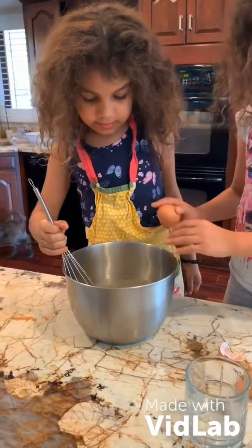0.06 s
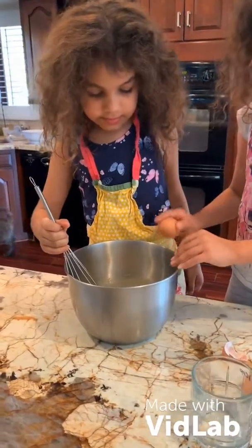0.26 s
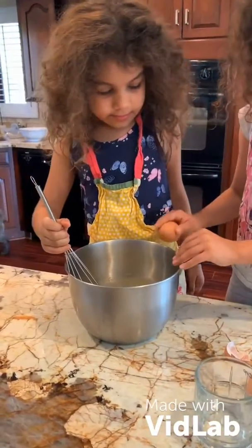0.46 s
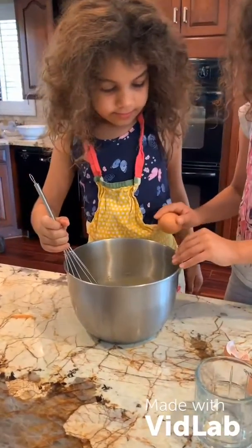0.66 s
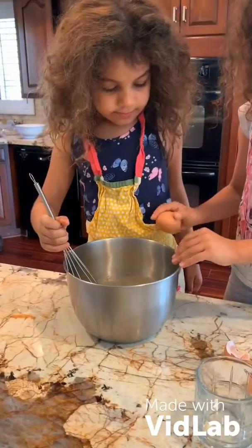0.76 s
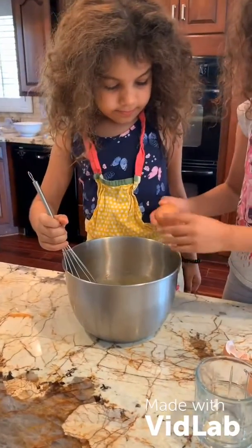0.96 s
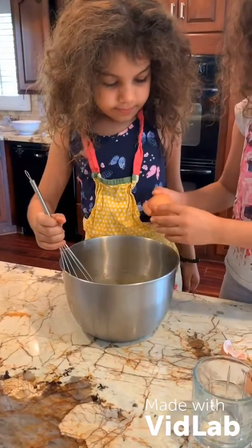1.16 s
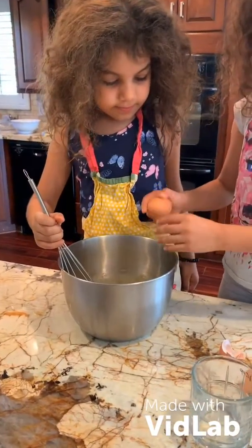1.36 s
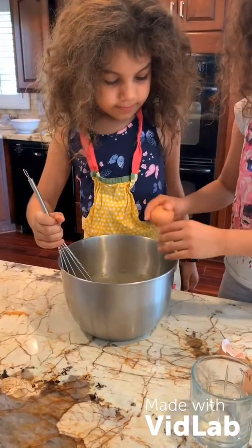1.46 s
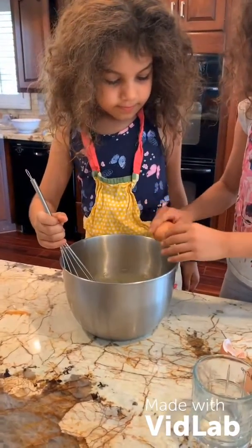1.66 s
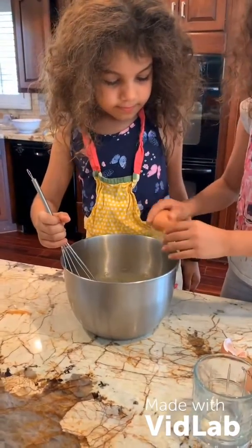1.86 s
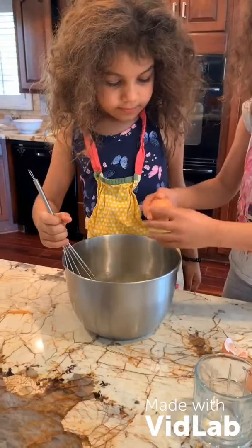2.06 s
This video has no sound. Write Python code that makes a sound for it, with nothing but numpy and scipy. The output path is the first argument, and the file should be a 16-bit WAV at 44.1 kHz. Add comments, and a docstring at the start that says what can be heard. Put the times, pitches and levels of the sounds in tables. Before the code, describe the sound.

An egg taps sharply on a steel mixing bowl rim, then again more softly, in a kitchen

```python
"""Under everything, a wavering low room rumble with a smooth hiss: shaped stereo noise.
First an egg is tapped on a steel bowl's rim: noise bursts crack and crunch, dying sines knock, thump, ring and boom.
Hands rustle (shaped noise) around a second, quieter tap with a shorter ring and a tiny shell tick.
Two more shell ticks follow, noise snaps with faint pings; a hard-walled kitchen answers taps and ticks.
The two channels drift apart in phase towards the treble."""
import sys
import numpy as np
from scipy import signal
from scipy.fft import rfft, irfft, next_fast_len
from scipy.io import wavfile
from scipy.ndimage import uniform_filter1d, map_coordinates

SR = 44100
rng = np.random.default_rng(int(sys.argv[2]) if len(sys.argv) > 2 else 0)


def file_out(sig):
    """Save sig as 16-bit WAV at sys.argv[1]."""
    # one column per channel
    cols = np.atleast_2d(sig).T
    # limit, then scale
    lim = np.clip(cols, -1, 1)
    pcm = np.round(lim * 32767).astype(np.int16)
    wavfile.write(sys.argv[1], SR, pcm)


N = 92610  # samples


def amp(db):
    """Decibels to gain."""
    return 10 ** (np.asarray(db) / 20)


def unit(x):
    """Scale to rms 1."""
    return x / np.sqrt(np.mean(x ** 2) + 1e-20)


def along(points, hz):
    """Interpolate (Hz, value) points on a log-frequency axis."""
    point_hz, value = np.transpose(points)
    return np.interp(np.log(hz + 1), np.log(point_hz + 1), value)


def since(start_s):
    """Seconds since start_s, zero before it."""
    return np.maximum(np.arange(N) / SR - start_s, 0)


def swell(t, rise_s):
    """Exponential approach to 1 with time constant rise_s."""
    return 1 - np.exp(-t / rise_s)


def fade(t, t60_s):
    """Exponential decay, down 60 dB after t60_s."""
    return np.exp(-np.log(1000) * t / t60_s)


def wobble(knots_per_s, knots=400):
    """Smooth random curve: a spline through normal random knots."""
    return map_coordinates(rng.standard_normal(size=knots), [since(0) * knots_per_s])


def filtered(x, response):
    """Multiply the spectrum of x by a response of frequency."""
    size = next_fast_len(N + SR // 2)
    hz = np.fft.rfftfreq(size, 1 / SR)
    return irfft(rfft(x, size) * response(hz), size)[..., :N]


def coloured(x, points):
    """Minimum-phase filter through (Hz, dB) points, by folding the cepstrum to be causal."""
    size = 2 * next_fast_len(N)
    hz = np.fft.rfftfreq(size, 1 / SR)
    cepstrum = irfft(np.log(amp(along(points, hz))))
    cepstrum[1:size // 2] *= 2
    cepstrum[size // 2 + 1:] = 0
    return irfft(rfft(x, size) * np.exp(rfft(cepstrum)))[..., :N]


# Likeness of the two channels. Each row: frequency in Hz, correlation from 0 to 1.
CHANNEL_LIKENESS = [(100, 0.95), (350, 1), (650, 0.12), (1500, 0.66), (3000, 0.35), (4000, 0.61), (4600, 1),
                    (15000, 1)]


def diffuse():
    """White stereo noise; the mid/side balance sets channel correlation by frequency."""
    def mid_side_gain(hz):
        angle = np.arccos(np.clip(along(CHANNEL_LIKENESS, hz), -1, 1)) / 2
        return np.array([np.cos(angle), np.sin(angle)])

    mid, side = filtered(rng.standard_normal((2, N)), mid_side_gain)
    return np.array([mid + side, mid - side])


def burst(envelope, count=6):
    """Noise under an envelope, alternately flattened in spectrum and in time so no band is missing."""
    x = envelope * rng.standard_normal(N)
    for _ in range(count):
        spectrum = rfft(x)
        x = irfft(spectrum / (abs(spectrum) + 1e-12), N)
        local_rms = np.sqrt(abs(uniform_filter1d(x * x, size=64)) + 1e-12)
        x = envelope * x / local_rms
    return x


WANDER_KNOTS_PER_S = 29


def ring(modes, t, wander_rad, attack_s=0, rise_cycles=0):
    """Sum of dying sines, one per mode, that swell in and wander in phase."""
    total = 0
    for k, (hz, db, t60_s) in enumerate(modes):
        envelope = swell(t, attack_s + rise_cycles / hz) * fade(t, t60_s)
        phase = 2 * np.pi * hz * t + wander_rad * wobble(WANDER_KNOTS_PER_S)
        total = total + (-1) ** k * amp(db) * envelope * np.sin(phase)  # alternating polarity
    return total


# Rumble and hiss spectrum. Each row: frequency in Hz, relative density in dB.
RUMBLE_SPECTRUM = [(15, -23), (30, -15), (48, 3), (64, -9), (92, 3), (125, -6), (161, -10.5), (220, -4),
                   (280, -3), (330, -10.5), (430, -13), (650, -21), (1000, -32.5), (1400, -35.5),
                   (1800, -37.5), (2400, -39), (3200, -42.5), (6000, -42.5), (7400, -41), (10000, -45.5),
                   (14000, -46), (16000, -60.5)]
RUMBLE_DB, WAVER_DB, WAVER_KNOTS_PER_S, WAVER_BELOW_HZ = -60.5, 0.9, 8.3, 830


def room_tone():
    """Low rumble under a smooth hiss: shaped noise whose low part wavers in level."""
    noise = unit(filtered(diffuse(), lambda hz: amp(along(RUMBLE_SPECTRUM, hz))))
    low = filtered(noise, lambda hz: 1 / (1 + (hz / WAVER_BELOW_HZ) ** 2))
    waver_gain = amp(WAVER_DB * wobble(WAVER_KNOTS_PER_S, knots=200))
    return amp(RUMBLE_DB) * (noise + low * (waver_gain - 1))


# Rustle level. Each row: time in seconds, level in dB.
RUSTLE_LEVEL = [(1.0, -90.5), (1.25, -77), (1.5, -68.5), (1.64, -69.5), (1.75, -62.5), (1.81, -75),
                (1.9, -88)]
# Rustle spectrum. Each row: frequency in Hz, relative density in dB.
RUSTLE_SPECTRUM = [(100, -20), (330, 6.5), (560, 8), (800, -4), (1550, -5.5), (2000, -12), (2600, -13),
                   (3500, -19), (8000, -29.5), (16000, -49.5)]
RUSTLE_WAVER_DB, RUSTLE_KNOTS_PER_S = 2.5, 20


def rustle():
    """Hands shift their hold on the egg around the second tap: shaped noise of unsteady level."""
    level_db = np.interp(since(0), *np.transpose(RUSTLE_LEVEL))
    level_db = level_db + RUSTLE_WAVER_DB * wobble(RUSTLE_KNOTS_PER_S)
    noise = unit(filtered(diffuse(), lambda hz: amp(along(RUSTLE_SPECTRUM, hz))))
    return amp(level_db) * noise


# First echoes from counter and cupboards. Each row: delay in seconds, level in dB.
WALL_ECHOES = [(.0105, -12.5), (.0195, -11), (.029, -14)]
WALLS_DULL_HZ = 3500


def walls(x):
    """First echoes: delayed copies through a one-pole low-pass."""
    def response(hz):
        echoes = sum(amp(db) * np.exp(-2j * np.pi * hz * delay_s) for delay_s, db in WALL_ECHOES)
        return echoes / (1 + 1j * hz / WALLS_DULL_HZ)

    return filtered(x, response)


# Kitchen decay. Each row: frequency in Hz, t60 in seconds.
KITCHEN_T60 = [(100, 0.83), (400, 0.72), (1000, 0.67), (2500, 0.71), (4500, 0.63), (7000, 0.3859),
               (10000, 0.3338), (15000, 0.14)]
# Kitchen tail colour. Each row: frequency in Hz, level in dB.
KITCHEN_COLOUR = [(60, -0.5), (250, 0.5), (700, 4), (1500, -3), (3000, 0), (5000, -12), (7500, -5),
                  (11000, -12.5), (15000, -9.5)]
KITCHEN_ONSET_S = 0.0026


def kitchen(x):
    """Convolve with a fresh stereo noise tail in which each frequency dies at its own speed."""
    hz, t, spectrum = signal.stft(diffuse(), SR, nperseg=256)
    t60_s = along(KITCHEN_T60, hz)[:, None]
    equal_energy = np.sqrt(2 * np.log(1000) / (t60_s * SR))  # same energy whatever the t60
    decaying = spectrum * fade(t, t60_s) * equal_energy
    tail = signal.istft(decaying, SR, nperseg=256)[1][:, :N]
    tail = tail * (1 - np.exp(-(since(0) / KITCHEN_ONSET_S) ** 2))
    return coloured(signal.fftconvolve(x[None], tail, axes=1)[:, :N], KITCHEN_COLOUR)


KNOCK_WANDER_RAD = 0.073  # also for thump and shell pings

# Eggshell ticks. Each row: start in seconds, level in dB, snap t60 in seconds.
SHELL_TICKS = [(1.5695, -45, 0.005), (1.9883, -48, 0.019), (1.995, -62.5, 0.078)]
# Snap spectrum. Each row: frequency in Hz, level in dB.
SNAP_COLOUR = [(300, -3), (1000, -14), (1500, 1), (2100, -7), (2550, 7), (2850, 1.5), (3500, 3.5),
               (5200, 0), (6000, 4.5), (6600, 0.5), (7500, 4), (9000, 0.5), (10200, 1.5), (11200, -10),
               (16000, -20)]
# Shell ping modes. Each row: frequency in Hz, level in dB before halving, t60 in seconds.
SHELL_MODES = [(1534, -12.5, 0.027), (2540, -7, 0.054), (5950, -6, .035)]
SNAP_RISE_S, PING_RISE_S, TICK_WET_DB = 0.00017, 0.0006, -6.5


def shell_ticks():
    """The cracked shell snaps and rings faintly: noise bursts plus short modes, with kitchen tail."""
    snaps, pings = 0, 0
    for start_s, db, t60_s in SHELL_TICKS:
        t = since(start_s)
        snaps = snaps + amp(db) * burst(swell(t, SNAP_RISE_S) * fade(t, t60_s))
        pings = pings + amp(db) * ring(SHELL_MODES, t, KNOCK_WANDER_RAD, attack_s=PING_RISE_S)
    ticks = coloured(snaps, SNAP_COLOUR) + pings / 2
    return ticks + amp(TICK_WET_DB) * kitchen(ticks)


# Contact crunch spectrum. Each row: frequency in Hz, level in dB.
CRUNCH_COLOUR = [(40, -12), (110, -3), (190, -11.5), (400, -2.5), (560, -5.5), (1000, -8), (2000, -5.5),
                 (3400, -13.5), (4050, 3), (4700, 1.5), (5700, 0), (7200, 5), (9000, -7.5), (11000, -7.5),
                 (15500, -16), (16600, -29.5)]
# First crack spectrum. Each row: frequency in Hz, level in dB.
CRACK_COLOUR = [(100, -14.5), (500, -4.5), (1000, 8), (1700, 3.5), (3000, -5), (5000, -4.5), (7500, -0.5),
                (10500, 2.5), (13000, 0), (16500, -7)]
CRUNCH_RISE_S, CRUNCH_T60_S, CRACK_RISE_S, CRACK_T60_S = 0.001, 0.018, 0.0006, 0.007


def shell_contact(start_s, crunch_db, hold_s, crack_db):
    """The shell cracks and crunches on the rim: two noise bursts, the crunch held before it decays."""
    t = since(start_s)
    crushing = swell(t, CRUNCH_RISE_S) * fade(since(start_s + hold_s), CRUNCH_T60_S) / 2
    cracking = swell(t, CRACK_RISE_S) * fade(t, CRACK_T60_S)
    crunch = amp(crunch_db) * coloured(burst(crushing), CRUNCH_COLOUR)
    crack = amp(crack_db) * coloured(burst(cracking), CRACK_COLOUR)
    return crunch + crack


# Damped knock of the bowl under the egg. Each row: frequency in Hz, level in dB, t60 in seconds.
KNOCK_MODES = [(369.2, -2.5, 0.078), (438, 3.5, 0.063), (481, 4.5, .045), (665.5, -1, .07), (807, 2, 0.035),
               (914, -1.5, 0.082), (1149, 0.5, .04), (1340, -2, .04), (1649, 0, 0.054), (2022, -7, 0.055),
               (2561, -3.5, 0.053), (3960, 8.5, .026)]
# Hollow thump of bowl against counter. Each row: frequency in Hz, level in dB, t60 in seconds.
THUMP_MODES = [(272, -1, .11), (306.5, -3.5, .11), (414, -1, 0.19), (700, -9, .09)]


def bowl_knock(t, knock_db, thump_db):
    """Damped bowl modes plus a hollow thump; the low modes take longest to swell."""
    knock = amp(knock_db) * ring(KNOCK_MODES, t, KNOCK_WANDER_RAD, rise_cycles=0.86)
    thump = amp(thump_db) * ring(THUMP_MODES, t, KNOCK_WANDER_RAD, rise_cycles=1.3)
    return knock + thump


# Free ring of the steel. Each row: frequency in Hz, level in dB, t60 in seconds before the tap's factor.
STEEL_MODES = [(436, -7.5, 0.34), (662, -2, .45), (814, -5.5, 0.31), (893, -9.5, 0.64), (1078, -7, 0.33),
               (1157, -7.5, .4), (1390, -13, 0.76), (2187, -14.5, 0.85), (3990, 3.5, 0.48), (4090, 0, 0.7),
               (6420, -2.5, 0.36), (6850, -1, 0.41), (7080, -3, 0.38), (7020, 1.5, 0.23), (7410, -3, 0.34),
               (7550, -2, .3), (7800, -1.5, 0.4), (9400, -12, .19)]
STEEL_ATTACK_S, STEEL_WANDER_RAD = 0.00089, 1.6


def steel_ring(t, ring_db, length_factor):
    """Thin ring of the steel: modes with strongly wandering phase, all t60s scaled together."""
    scaled = [(hz, db, t60_s * length_factor) for hz, db, t60_s in STEEL_MODES]
    return amp(ring_db) * ring(scaled, t, STEEL_WANDER_RAD, attack_s=STEEL_ATTACK_S) / 2


# Low boom after a tap. Each row: frequency in Hz, level in dB, t60 in seconds.
BOOM_MODES = [(55, 2, 0.51), (70, -9.5, .16)]
BOOM_DELAY_S, BOOM_RISE_S = 0.010, 0.018


def low_boom(start_s, boom_db):
    """Slowly swelling low modes, just after the tap."""
    return amp(boom_db) * ring(BOOM_MODES, since(start_s + BOOM_DELAY_S), 0, attack_s=BOOM_RISE_S)


# Taps on the rim. Each row: start in seconds, crunch level in dB before halving, crunch hold in seconds,
# crack, knock and thump levels in dB, ring level in dB before halving, ring length factor,
# boom level in dB, then colour in dB at each tap colour frequency.
RIM_TAPS = [(.2420, -8.5, .006, -6, -28, -34.5, -37.5, 1, -37.5, 3.5, 2, 1, 1.65, -1.5, -1, 0.5, 1, 0, 2, 0.0056),
            (1.57, -19, 0.00198, -19.5, -42.5, -38, -42.5, 0.35, -45, 2.4, 3, 0.3, -7, -8.5, -10, -6, 0.65, 1.5, -7, 2.3)]
# Tap colour frequencies, in Hz.
TAP_COLOUR_HZ = [100, 300, 480, 900, 1700, 2700, 4000, 5200, 6700, 8000, 13000]
# Channel balance of the taps. Each row: frequency in Hz, left over right in dB.
TAP_BALANCE = [(200, 1), (500, 0), (800, -1), (2000, -0.5), (5000, 1), (15000, -1.24)]
KNOCK_WET_DB, STEEL_WET_DB = -9, -7.5


def bowl_taps():
    """Egg on steel rim: contact, knock, ring and boom, answered by first echoes and kitchen tail."""
    taps = np.zeros((2, N))
    for row in RIM_TAPS:
        start_s, crunch_db, hold_s, crack_db, knock_db, thump_db, ring_db, ring_length, boom_db = row[:9]
        t = since(start_s)
        parts = [shell_contact(start_s, crunch_db, hold_s, crack_db),
                 bowl_knock(t, knock_db, thump_db),
                 steel_ring(t, ring_db, ring_length)]
        tap_colour = list(zip(TAP_COLOUR_HZ, row[9:]))
        contact, knock, steel = coloured(np.array(parts), tap_colour)
        send = contact + amp(KNOCK_WET_DB) * knock + amp(STEEL_WET_DB) * steel
        room = walls(contact) + kitchen(send)
        taps += contact + knock + steel + low_boom(start_s, boom_db) + room
    half_each = np.array([[0.5], [-0.5]])
    return filtered(taps, lambda hz: amp(along(TAP_BALANCE, hz) * half_each))


def scene():
    """Room rumble, moving hands, eggshell ticks and taps on the bowl."""
    return room_tone() + rustle() + shell_ticks() + bowl_taps()


# Phase between the channels. Each row: frequency in Hz, lead of the left in radians.
LEFT_LEAD = [(30, 0), (200, -.2), (550, -.65), (1400, -.25), (2000, .4), (3500, 1.6), (4100, 2.1),
             (4700, 3.14), (5700, 4.7), (6750, 6.28), (7800, 7.7), (8950, 9.42), (11150, 12.57),
             (13100, 15.71), (15000, 18.85)]
CEILING, LOW_CUT_HZ, TOP_HZ = 0.6, 40, 16100


def record(dry):
    """Output: phase spread between channels, soft peak rounding, band limits."""
    half_each = np.array([[0.5], [-0.5]])
    wide = filtered(dry, lambda hz: np.exp(1j * along(LEFT_LEAD, hz) * half_each))
    rounded = wide / (1 + (wide / CEILING) ** 4) ** (1 / 4)
    low_cut = signal.butter(3, LOW_CUT_HZ, "high", fs=SR, output="sos")
    return filtered(signal.sosfilt(low_cut, rounded), lambda hz: 1 / (1 + (hz / TOP_HZ) ** 100))


dry = scene()
out = record(dry)
file_out(out)
```